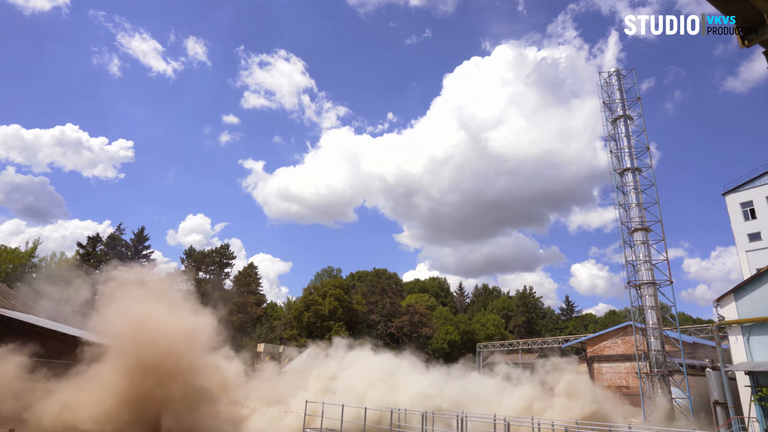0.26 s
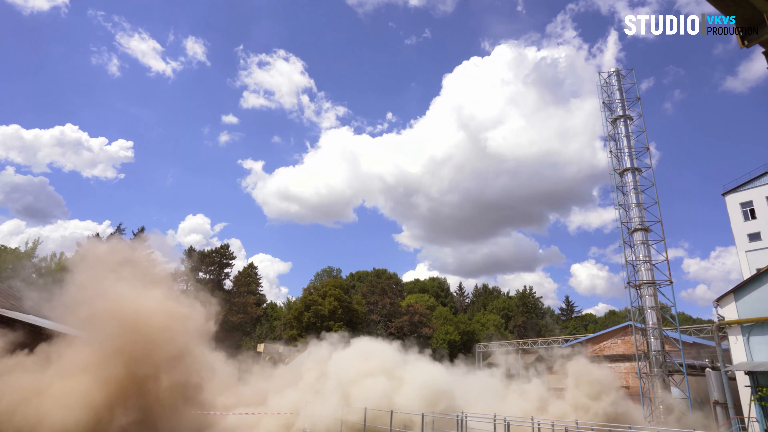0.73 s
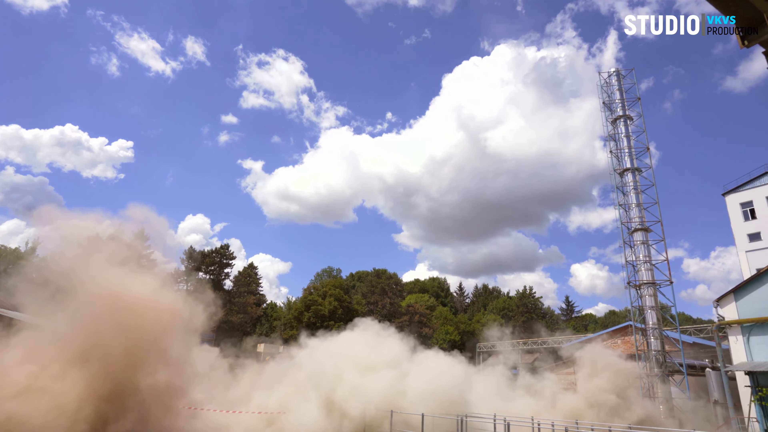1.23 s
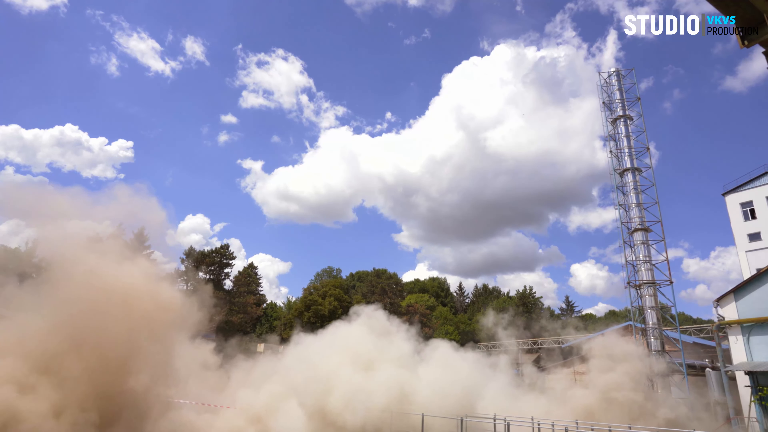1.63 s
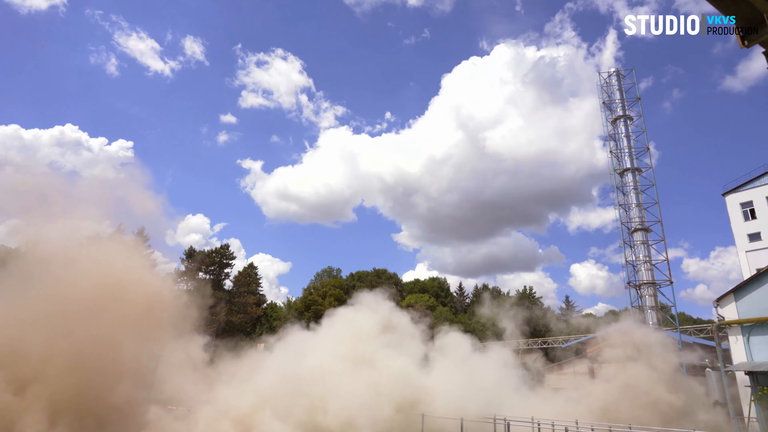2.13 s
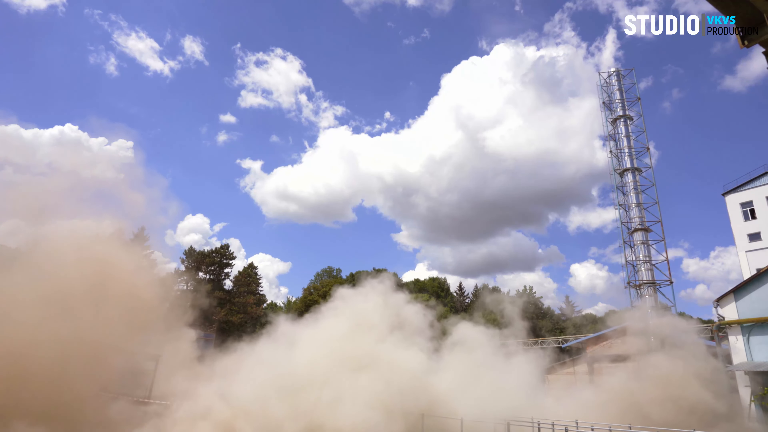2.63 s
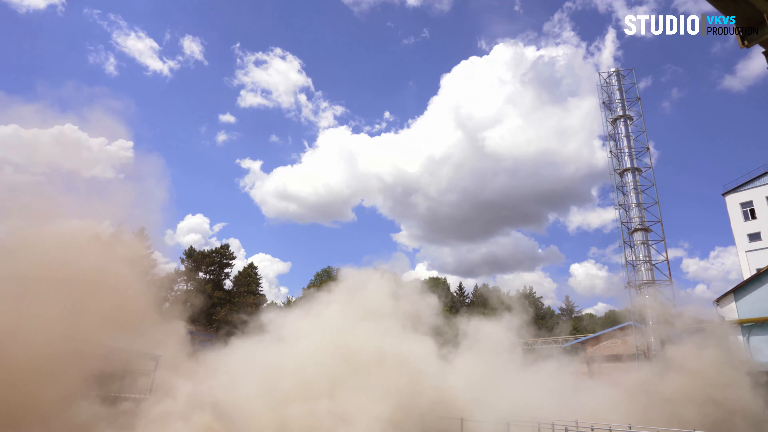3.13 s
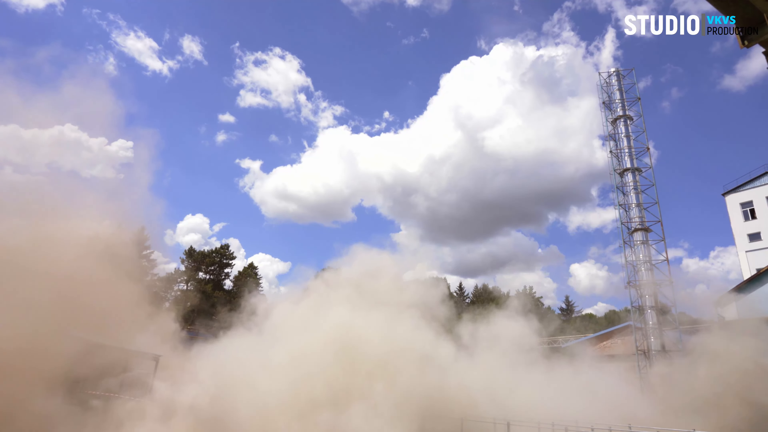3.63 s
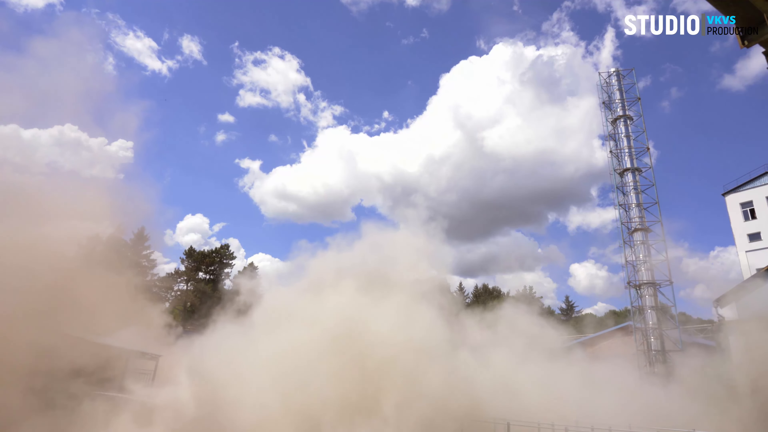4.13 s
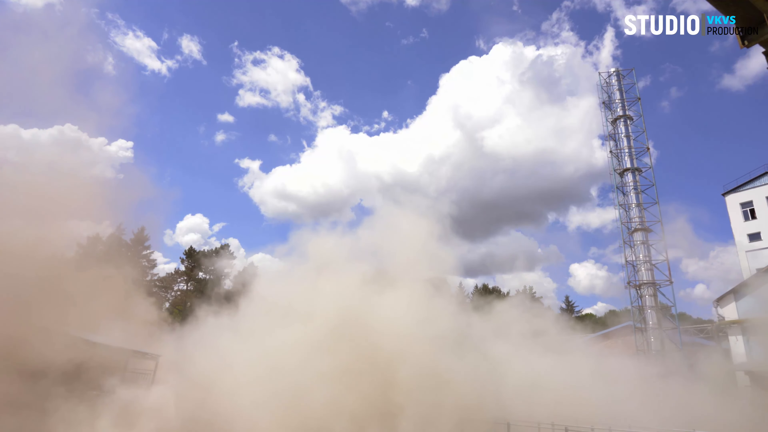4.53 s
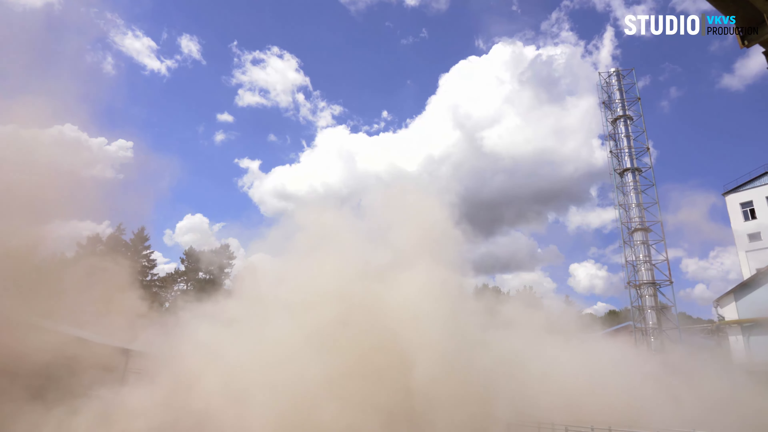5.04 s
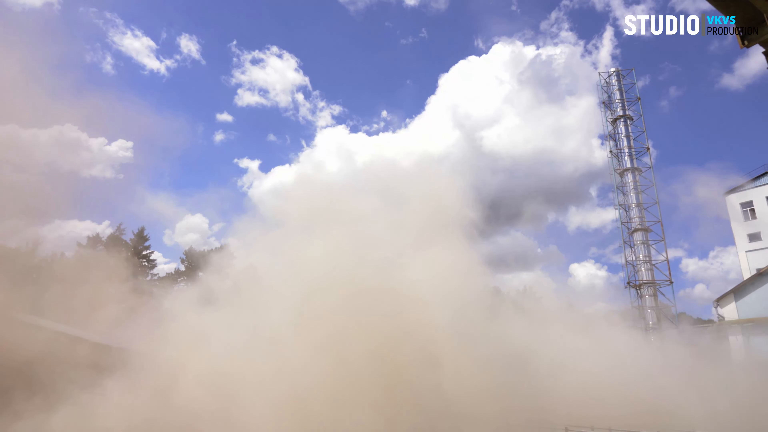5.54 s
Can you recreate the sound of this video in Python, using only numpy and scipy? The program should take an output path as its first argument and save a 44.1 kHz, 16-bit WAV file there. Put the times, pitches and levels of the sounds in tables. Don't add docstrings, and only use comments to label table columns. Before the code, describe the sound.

Outdoors in a yard, a collapsing building booms and rumbles, with low ground shake, midrange masonry clatter and faint fizzing grit echoing off distant walls. It fades unevenly for three seconds, then stops abruptly. A dull, steady dust hiss continues, joined by a hollow wind-like roar, low stirring air and a few soft thuds. Muffled single microphone, mono.

```python
import sys
import numpy as np
from scipy import signal
from scipy.fft import rfft, irfft, next_fast_len
from scipy.io import wavfile
from scipy.ndimage import uniform_filter1d, map_coordinates

SR = 44100
rng = np.random.default_rng(int(sys.argv[2]) if len(sys.argv) > 2 else 0)


def invert_db(x):
    u = np.asarray(x, float) / 20
    return 10 ** u


def bounce(signal):
    frames = np.transpose(np.atleast_2d(signal))
    limited = np.clip(frames, -1, 1)
    pcm = np.round(limited * 32767).astype(np.int16)
    wavfile.write(sys.argv[1], SR, pcm)


N = 254456


def unit(x):
    return x / np.sqrt(np.mean(x ** 2) + 1e-20)


def along(points, hz):
    point_hz, value = np.transpose(points)
    return np.interp(np.log(hz + 1), np.log(point_hz + 1), value)


def curves(rows):
    s, *cols = np.transpose(rows)
    return [uniform_filter1d(np.interp(np.arange(N) / SR, s, c), size=400) for c in cols]


def swells(rows, half_s):
    s, db = np.transpose(rows)
    t = np.arange(0, N + 64, 64) / SR
    bells = np.exp(-((t - s[:, None]) / half_s) ** 2)
    return np.interp(np.arange(N) / SR, t, db @ bells)


def wobble(rate):
    return map_coordinates(rng.standard_normal(200), [np.arange(N) * rate / SR])


def filtered(x, response):
    m = next_fast_len(N + SR // 2)
    return irfft(rfft(x, m) * response(np.fft.rfftfreq(m, 1 / SR)), m)[:N]


def coloured(x, spectrum):
    return unit(filtered(x, lambda hz: invert_db(along(spectrum, hz))))


def even(x, span_s):
    span = round(span_s * SR)
    slow = uniform_filter1d(uniform_filter1d(x ** 2, span), span)
    return x / np.sqrt(np.abs(slow) + 1e-6)


def rush(patchy_db):
    z = signal.stft(rng.standard_normal(N + 512), nperseg=512)[2]
    field = uniform_filter1d(rng.standard_normal(z.shape), size=6, axis=0)
    field = uniform_filter1d(field, size=12, axis=1)
    return signal.istft(z * invert_db(patchy_db * unit(field)), nperseg=512)[1][:N]


def wall_tail():
    # pitch_hz [Hz], t60_s [s]
    decay = [(100, 0.8), (1000, 1.83), (5000, 0.27)]
    hz, t, z = signal.stft(rng.standard_normal(SR // 2), SR, nperseg=256)
    fading = invert_db(-60 * t / along(decay, hz)[:, None])
    return signal.istft(z * fading, SR, nperseg=256)[1][:SR // 2]


def impacts(rate, spread_db, wet):
    lead, hop = SR // 2, SR // 5
    draw = rng.random((2, N + lead))
    lands = draw[0] < rate / SR
    size = invert_db(-spread_db * np.log(draw[1] + 1e-9))
    blows = lands * size * rng.standard_normal(N + lead)
    echo = np.zeros(N + 3 * lead)
    for i in range(0, N + lead, hop):
        answer = signal.fftconvolve(blows[i:i + hop], wall_tail())
        echo[i:i + len(answer)] += answer
    return (1 - wet) * unit(blows[lead:]) + wet * unit(echo[lead:lead + N])


def between_walls(x):
    # pitch_hz [Hz], width_hz [Hz], level_db [dB]
    modes = [(151, 18, -3.5), (215, 8.1, -14.5), (462.6, 4.9, -14)]

    def response(f):
        rings = [invert_db(db) * 1j * f * w / (c * c - f * f + 1j * f * w) for c, w, db in modes]
        return 1 + sum(rings)
    return filtered(x, response)


def layer_db(over_db, fades, hz):
    # time_s [s], level_db [dB]
    fall = [(0, -23), (.4, -24.5), (.7, -25), (1.1, -26), (1.6, -28), (2.1, -29), (2.5, -33), (2.9, -35.5),
            (3.11, -36)]
    # time_s [s], swell_db [dB], pitch_hz [Hz]
    slabs = [(.01, 1.5, 130), (.16, 1, 400), (.22, 6, 150), (.26, 5, 85), (.35, 0.5, 400), (0.519, -2, 497),
             (.57, 9.5, 90), (.61, 6, 150), (.72, 3, 200), (.8, 5, 85), (1.0, -4, 150), (1.07, 8.5, 150),
             (1.08, 2, 400), (1.12, -3, 400), (1.16, -3, 400), (1.22, 4.5, 130), (1.27, -12, 85),
             (1.29, 9, 150), (1.36, 1.5, 300), (1.42, -18, 250), (1.47, -2, 85), (1.5, 4, 600),
             (1.56, 2.5, 400), (1.95, -4, 150), (1.7, 6, 90), (2.03, 0, 400), (2.13, 0.5, 170),
             (2.29, -9, 300), (2.39, 1.5, 150), (2.44, 2.5, 400), (2.49, 15, 120), (2.75, 7, 85), ]
    reach_octaves, half_s = .5, .025
    fall_db, = curves(fall)
    near = []
    for s, db, slab_hz in slabs:
        near.append((s, db * np.exp(-(np.log2(slab_hz / hz) / reach_octaves) ** 2)))
    return fall_db[0] + over_db + fades * (fall_db - fall_db[0]) + swells(near, half_s)


def ground_shake(heavy):
    # pitch_hz [Hz], level_db [dB per Hz]
    spectrum = [(10, -35), (25, -13.5), (50, -9.5), (75, 0.5), (105, 1), (140, -14), (400, -120)]
    return invert_db(layer_db(-7.5, fades=1.31, hz=85)) * even(coloured(heavy, spectrum), span_s=0.17)


def air_boom(heavy):
    # pitch_hz [Hz], level_db [dB per Hz]
    spectrum = [(40, -90), (90, -22), (115, -4.5), (144, 2), (200, 0), (260, -17.5), (700, -120)]
    return invert_db(layer_db(-5.54, fades=1.01, hz=150)) * even(coloured(heavy, spectrum), span_s=0.055)


def falling_masonry():
    # pitch_hz [Hz], level_db [dB per Hz]
    spectrum = [(60, -72), (170, -12), (230, 2), (400, 1), (600, -1.5), (1000, -6.5), (1400, -12.5),
                (2100, -24.5), (3000, -57), (4500, -49.5), (7000, -120)]
    blows = between_walls(impacts(rate=4000, spread_db=2.5, wet=0.52))
    return invert_db(layer_db(1.68, fades=0.94, hz=400)) * even(coloured(blows, spectrum), span_s=0.091)


def grit_fizz():
    # pitch_hz [Hz], level_db [dB per Hz]
    spectrum = [(2000, -92.5), (4000, -4), (5800, 2), (7000, 2.5), (9500, 0), (12800, -8.5), (13700, -14),
                (15700, -20.5), (17000, -88)]
    # time_s [s], delay_ms [ms]
    ground_path = [(1.1, .43), (1.18, .47), (1.5, .36), (1.85, .27), (2.05, .245)]
    sinks_s, wall_ms = 1.1, .72
    direct = rush(patchy_db=.8)
    ground_share = np.where(np.arange(N) < sinks_s * SR, .17, .24)
    late = np.arange(N) - curves(ground_path)[0] * SR / 1000
    off_ground = ground_share * map_coordinates(direct, [late])
    off_wall = .17 * np.roll(direct, round(wall_ms * SR / 1000))
    fizz = coloured(direct + off_ground + off_wall, spectrum)
    return invert_db(layer_db(-43, fades=1.08, hz=450)) * fizz


def collapse():
    cut_s, close_s = 3.1125, .0036
    ground_left, ground_dies_s = .45, .2
    t = np.arange(N) / SR
    heavy = between_walls(impacts(rate=900, spread_db=0.5, wet=0.42))
    shake = ground_shake(heavy)
    falling = shake + air_boom(heavy) + falling_masonry() + grit_fizz()
    sounding = np.clip((cut_s - t) / close_s, 0, 1)
    lingering = (1 - sounding) * ground_left * np.exp(-np.abs(t - cut_s) / ground_dies_s)
    return sounding * falling + lingering * shake


def dust_hiss():
    # pitch_hz [Hz], level_db [dB per Hz]
    spectrum = [(60, -89.5), (300, -18), (800, -2), (1300, -1), (1650, -2.5), (2100, -5.5), (3000, -14.5),
                (4000, -25.5), (5000, -37), (6200, -52.5), (7300, -62.5), (12000, -120)]
    thins_db_per_s = .5
    thicker_s, rise_s, thicker_db = 3.61, .06, 2.1
    t = np.arange(N) / SR
    thicker = (1 + np.tanh((t - thicker_s) / rise_s)) / 2
    level_db = -33.12 - thins_db_per_s * t + thicker_db * thicker
    return invert_db(level_db) * coloured(rush(patchy_db=0.64), spectrum)


def cloud_front():
    peak_s, rise_s, dies_s, left = 3.94, 0.59, .5, 0.47
    t = np.arange(N) / SR
    before = np.exp(-((t - peak_s) / rise_s) ** 2)
    after = left + (1 - left) * np.exp(-np.abs(t - peak_s) / dies_s)
    return np.where(t < peak_s, before, after)


def hollow_roar(front):
    # pitch_hz [Hz], level_db [dB per Hz]
    spectrum = [(100, -90.5), (350, -35), (550, -1), (700, 2), (900, -5.5), (1300, -33), (3000, -120)]
    swell_db, eddy_db, eddies_per_s = 9.5, 1, 12
    level_db = -47.45 + swell_db * front + eddy_db * wobble(eddies_per_s)
    return invert_db(level_db) * even(coloured(rush(patchy_db=-0.1), spectrum), span_s=0.06)


def low_stir(front):
    # pitch_hz [Hz], level_db [dB per Hz]
    spectrum = [(12, -44), (30, -21.5), (60, -9.5), (100, -6), (160, -0.5), (330, -1.5), (500, 0.5),
                (800, -38), (2500, -120)]
    # time_s [s], swell_db [dB]
    eddies = [
        (3.2, 1.5),
        (3.5, 0.5),
        (3.75, 1),
        (4.0, 1.5),
        (4.53, 2.5),
        (4.95, 0.5),
        (5.15, -2),
        (5.3, 1),
        (5.7, 1.5),
    ]
    level_db = -44.5 + 1.5 * front + swells(eddies, half_s=0.059)
    return invert_db(level_db) * even(coloured(rush(patchy_db=-0.6), spectrum), span_s=0.088)


def fine_dust():
    # pitch_hz [Hz], level_db [dB per Hz]
    spectrum = [(2000, -63.5), (6000, -7.5), (10000, -2), (15700, -9), (17000, -64)]
    # time_s [s], swell_db [dB]
    puffs = [
        (4.38, 2.5),
        (4.7, 3.5),
        (5.34, 4),
        (5.65, 2),
    ]
    return invert_db(-90.5 + swells(puffs, half_s=.04)) * coloured(rush(patchy_db=-1.7), spectrum)


def cloud():
    front = cloud_front()
    return dust_hiss() + hollow_roar(front) + low_stir(front) + fine_dust()


def debris_ticks():
    # start_s [s], peak_db [dB], brightest_hz [Hz], fall_db [dB per octave], length_ms [ms]
    ticks = [(.7274, -56, 6500, 4, .4), (1.0948, -51, 6500, 10, .5), (1.2632, -61, 14000, 4, .4),
             (1.3687, -60, 14000, 2, .4), (1.5004, -56, 6000, 22, .8), (1.5418, -51, 5800, 12, 1.6),
             (1.5786, -63, 6000, 14, .5), (1.68, -62, 14000, 3, .4), (1.8036, -57, 6500, 10, .4),
             (1.8804, -62, 6000, 14, .5), (1.9916, -50, 6500, 14, 1.4), (2.2328, -62, 6000, 9, .4),
             (2.5093, -57, 6500, 14, .5), (2.582, -56, 7000, 12, .8), (2.8639, -65, 7000, 8, .5),
             (3.3563, -71, 7000, 20, .8), (3.5212, -70, 7500, 22, .6), (3.5398, -65, 8600, 24, 1.5),
             (3.9498, -70, 8500, 22, .6), (5.2587, -67, 6000, 24, .6), (5.2773, -67, 9500, 20, .6),
             (5.2955, -59, 6500, 17, .7), (5.3382, -75, 9000, 14, .6)]
    out, t = np.zeros(N + SR), np.arange(SR // 10) / SR
    f = np.fft.rfftfreq(len(t), 1 / SR) + 1
    for s, db, hz, fall_db, length_ms in ticks:
        colour = invert_db(-fall_db * np.abs(np.log2(f / hz))) * (f > 3500)
        burst = unit(irfft(rfft(rng.standard_normal(len(t))) * colour, len(t)))
        envelope = np.exp(-1000 * t / length_ms) * (1 - np.exp(-t / .0002))
        out[round(s * SR):][:len(t)] += invert_db(db + 3.5) * burst * envelope
    return out[:N]


def late_thuds():
    # start_s [s], peak_db [dB], pitch_hz [Hz]
    thuds = [
        (3.35, -50, 44.5),
        (3.41, -52, 45),
        (3.62, -45, 60),
        (4.531, -37.5, 152),
        (4.61, -46, 55),
        (4.9, -52, 50),
        (5.28, -41, 75),
    ]
    rise_s = 0.0088
    out, t = np.zeros(N + SR), np.arange(SR // 10) / SR
    u = t / rise_s
    for s, db, hz in thuds:
        out[round(s * SR):][:len(t)] += invert_db(db) * np.sin(2 * np.pi * hz * t) * u * np.exp(1 - u)
    return out[:N]


def scene():
    return (collapse() + cloud() + debris_ticks() + late_thuds())[None]


def top_cut(x):
    return signal.sosfilt(signal.butter(12, 15720, fs=SR, output="sos"), x)


def record(dry):
    # start_s [s], peak_db [dB]
    splices = [
        (.0002, -23),
        (3.1115, -43),
        (3.5988, -33),
    ]
    end_s = .004
    clicks = np.zeros(N)
    for s, db in splices:
        clicks[round(s * SR):][:2] = invert_db(db - 2)
    ending = np.clip((N - np.arange(N)) / (end_s * SR), 0, 1)
    return top_cut(dry * ending + clicks)


dry = scene()
out = record(dry)
bounce(out)
```